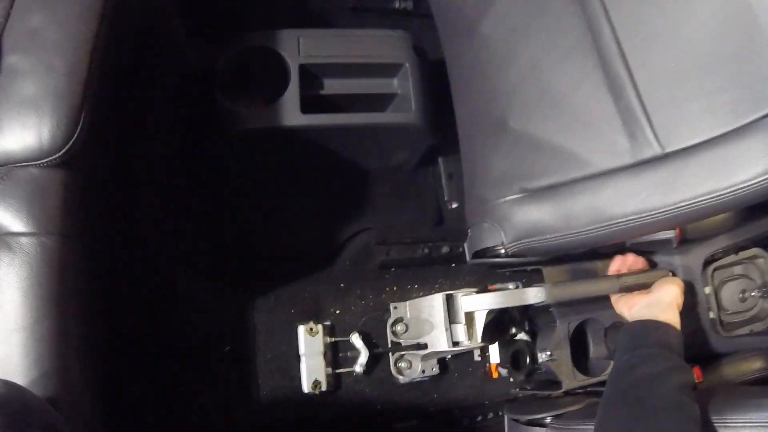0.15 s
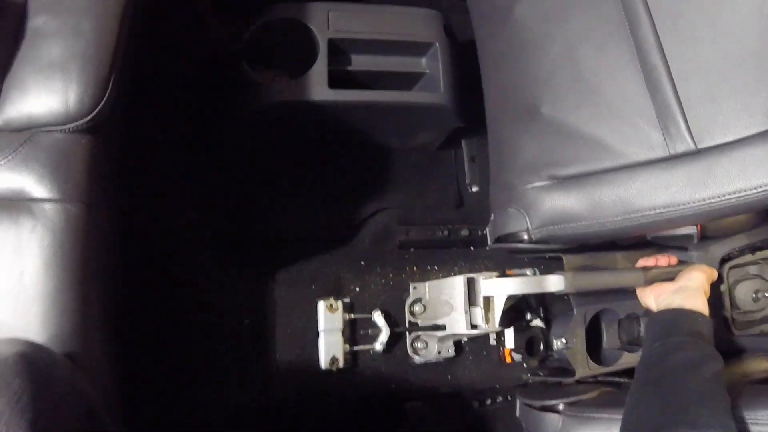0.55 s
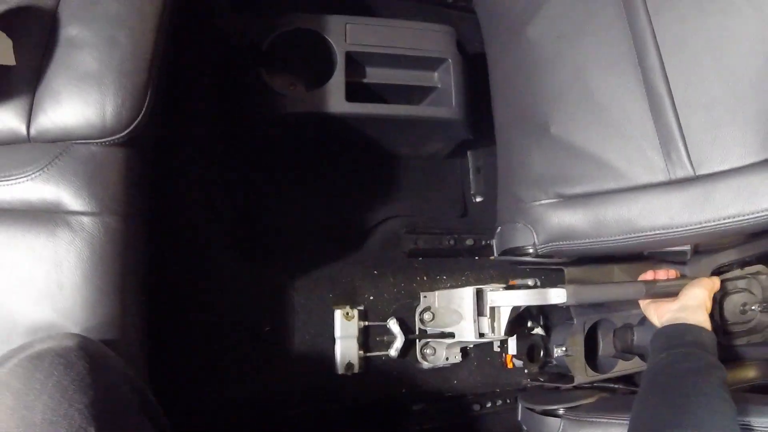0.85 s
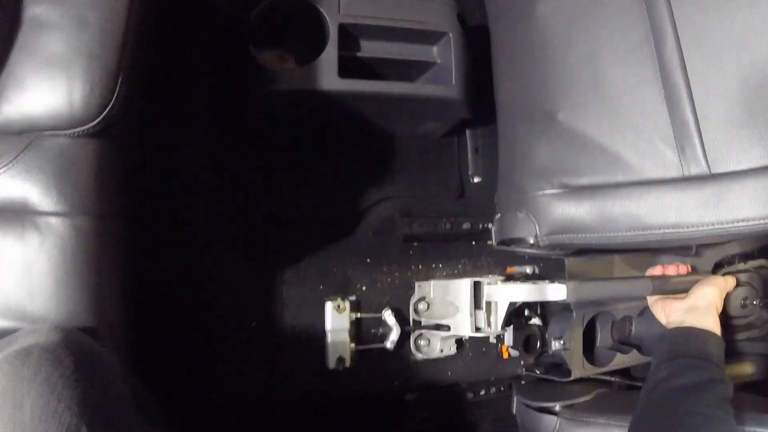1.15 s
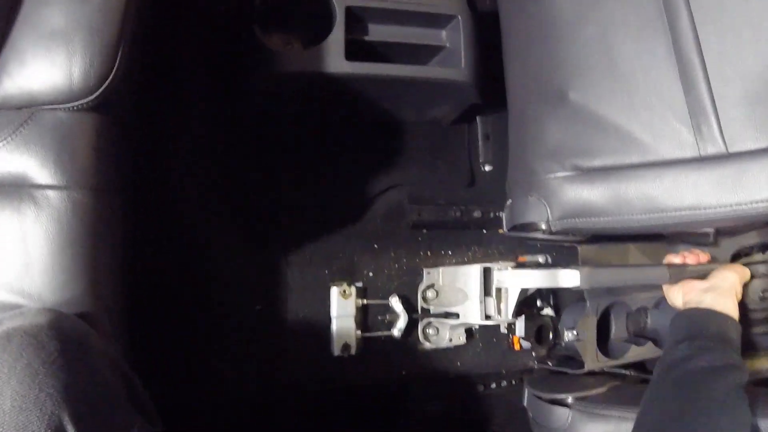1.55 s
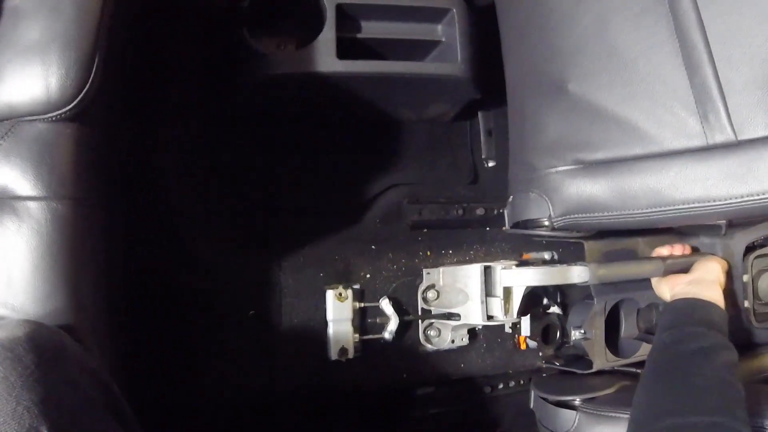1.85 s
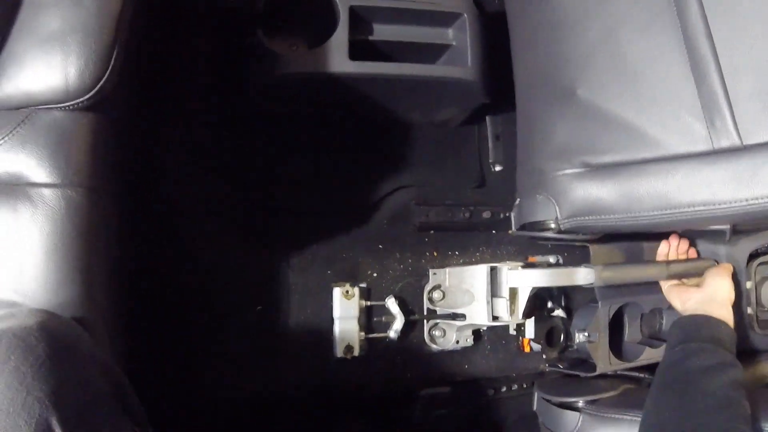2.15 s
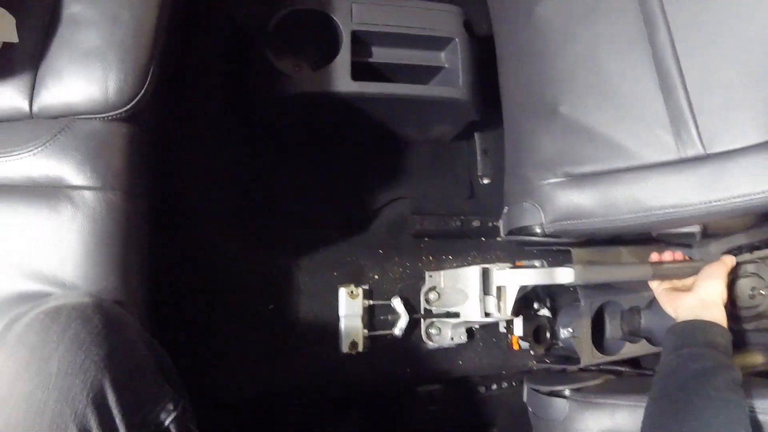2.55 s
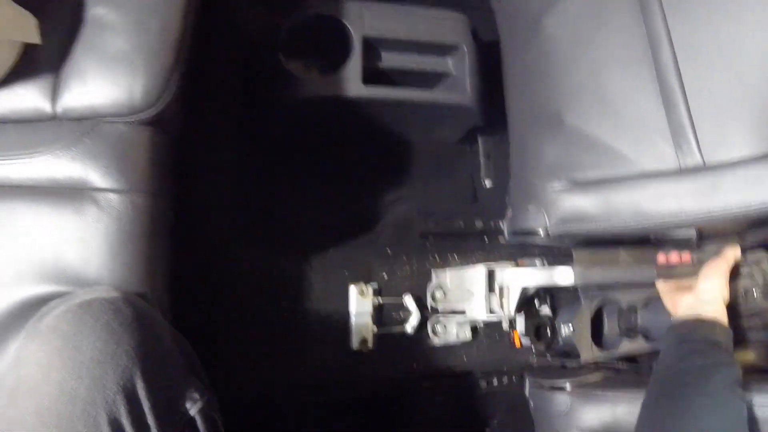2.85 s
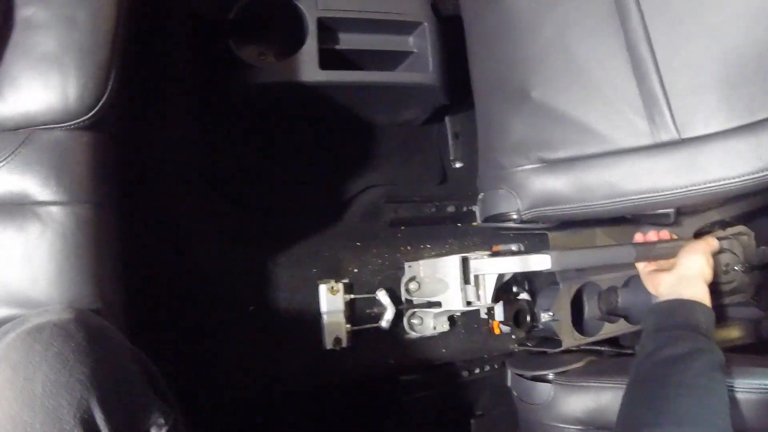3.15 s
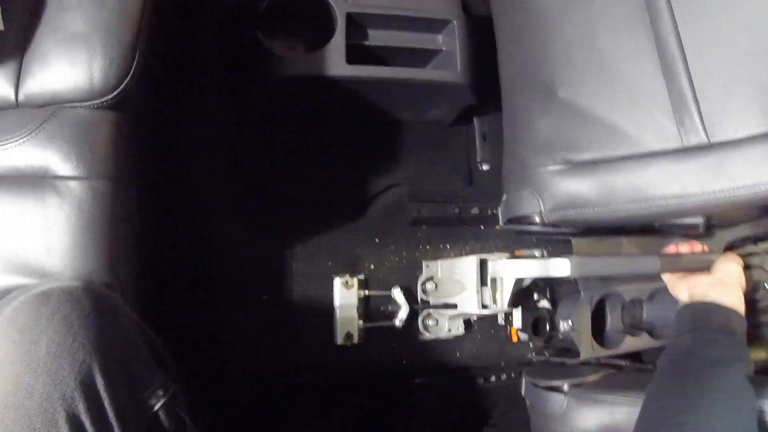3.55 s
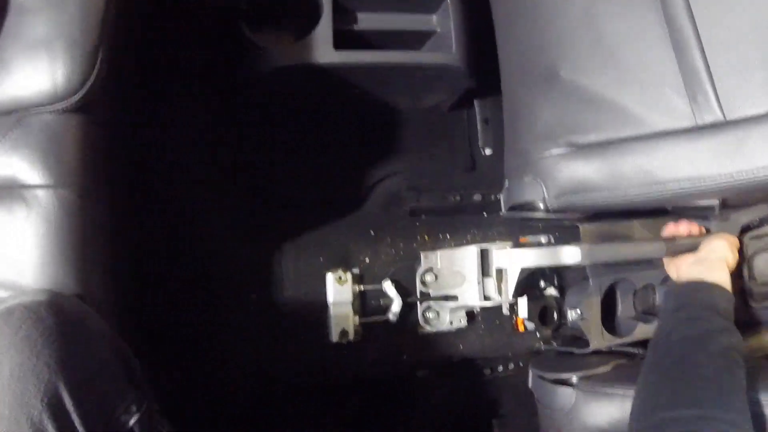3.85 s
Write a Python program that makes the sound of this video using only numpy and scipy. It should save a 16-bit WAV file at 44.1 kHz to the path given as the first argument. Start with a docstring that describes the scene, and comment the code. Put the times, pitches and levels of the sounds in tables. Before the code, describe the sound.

Handbrake lever ratchets up in sharp clicks, then drops with a hard clack, twice over.

```python
"""Handbrake in a parked car

A small camera microphone hears a handbrake lever pulled up and let down in the cabin, twice over.
The pawl snaps over the ratchet teeth and rebounds, the lever drops on its stop with a clack, the release
button and linkage tick: each contact rings the modes of lever and console and sets off a crack of noise.
The hand rubs, rustles and shakes the console: shaped noise that swells and wavers. The microphone adds
hiss and rumble, and its look-ahead limiter ducks before the loudest clacks."""
import sys
import numpy as np
from scipy import signal
from scipy.fft import rfft, irfft
from scipy.io import wavfile
from scipy.ndimage import uniform_filter1d

SR = 44100
rng = np.random.default_rng(int(sys.argv[2]) if len(sys.argv) > 2 else 0)


def voltage_ratio(decibels):
    """Convert decibels (scalar or array-like) to amplitude ratios, 20 dB per decade."""
    exponent = np.asarray(decibels, float) / 20
    return 10 ** exponent


def log_audio(samples):
    """Write samples as a 16-bit WAV file to the path given in sys.argv[1]."""
    # one column per channel
    frames = np.atleast_2d(samples).T
    # limit to full scale, then quantise
    limited = np.clip(frames, -1, 1)
    pcm = np.round(limited * 32767).astype(np.int16)
    wavfile.write(sys.argv[1], SR, pcm)


N = 176400  # samples, 4 s


def rms_one(x):
    """Scales a signal to rms 1."""
    return x / np.sqrt(np.mean(x ** 2) + 1e-20)


def at_hz(points, hz):
    """Reads a (hz, value) curve, straight between points on a log frequency axis."""
    point_hz, value = np.transpose(points)
    return np.interp(np.log(np.maximum(hz, 1)), np.log(point_hz), value)


def coloured(spectrum):
    """Steady noise of a given spectrum, rms 1."""
    hz = np.arange(N // 2 + 1) * SR / N
    white = rfft(rng.standard_normal(N))
    return rms_one(irfft(white * voltage_ratio(at_hz(spectrum, hz)), N))


def drift(rate_hz):
    """Slow chance, rms 1: noise through two equal low-pass poles."""
    r = np.exp(-2 * np.pi * rate_hz / SR)
    settled = signal.lfilter([1], [1, -2 * r, r * r], rng.standard_normal(N + SR))[SR:]
    return rms_one(settled)


def swells(rows):
    """Half-sine swells from rows (start_s, length_s, level_db)."""
    t = np.arange(N) / SR
    return sum(voltage_ratio(level_db) * np.sin(np.pi * np.clip((t - start_s) / length_s, 0, 1))
               for start_s, length_s, level_db in rows)


def ring(clicks, hz, t60_s):
    """A resonator: a unit click sets a dying sine of about height 1 ringing."""
    r, w = voltage_ratio(-60 / (t60_s * SR)), 2 * np.pi * hz / SR
    return signal.lfilter([0, np.sin(w)], [1, -2 * r * np.cos(w), r * r], clicks + 1e-18)


def train(start_s, gains):
    """Single-sample clicks at the given times."""
    return np.bincount(np.clip(start_s * SR, 0, N - 1).astype(int), gains, N)


# microphone hiss and rumble: (hz, relative level_db per Hz)
HISS_SPECTRUM = [(59, -34.5), (100, 0), (176, -10), (246, -15), (399, -16.5), (513, -13), (582, -18.5),
                 (660, -21), (1730, -23.5), (4180, -32), (6630, -23), (12700, -38.5), (15000, -53)]


def hiss():
    """Microphone noise, heavy in the bass, with a narrow band at the port resonance."""
    port_hz, port_width_hz = 6500, 260
    port = ring(rng.standard_normal(N), port_hz, np.log(1000) / (np.pi * port_width_hz))
    return voltage_ratio(-62.5) * coloured(HISS_SPECTRUM) + voltage_ratio(-76) * rms_one(port)


# grip and cable creak as the load shifts: (start_s, length_s, level_db before the lumps)
CREAKS = [(-.06, 0.16, -61), (.365, 0.082, -56), (.93, 0.04, -61.5), (.985, .035, -45.5),
          (1.16, .08, -52.5), (1.42, 0.063, -58), (1.51, 0.035, -43), (1.68, .06, -57), (1.855, 0.047, -50),
          (1.94, 0.038, -48), (2.0, 0.083, -68), (2.32, .14, -65), (2.48, 0.22, -61.5), (3.26, 0.093, -68),
          (3.35, 0.11, -62.5), (3.425, 0.059, -55), (3.54, .03, -48), (3.69, 0.057, -54.5),
          (3.85, 0.037, -45.5)]
# creak heard through the console: (hz, relative level_db per Hz)
CREAK_SPECTRUM = [(65, -33.5), (110, -12), (335, -10.5), (423, -18.5), (692, -10.5), (835, -17),
                  (937, -15.5), (3500, -36), (4550, -74.5), (7700, -120)]


def creaks():
    """Low and middle noise through the console, its swells made lumpy by a drifting level."""
    lumps_db = 3.3 * drift(55)
    return swells(CREAKS) * voltage_ratio(lumps_db) * coloured(CREAK_SPECTRUM)


# level curve of the hand shaking the console: (time_s, level_db)
SHAKING = [(0.0, -51), (0.21, -58.5), (0.39, -48), (0.62, -57), (0.67, -44), (0.96, -55.5), (1.02, -41),
           (1.14, -49), (1.2, -43), (1.27, -47.5), (1.3, -57), (1.36, -52.5), (1.51, -51), (1.54, -41),
           (1.56, -32), (1.65, -43.5), (1.88, -53), (1.96, -41.5), (2.04, -51.5), (2.46, -52), (2.52, -43),
           (2.63, -41.5), (2.71, -51), (2.96, -48), (2.99, -48.5), (3.35, -57), (3.41, -42), (3.53, -61),
           (3.55, -47), (3.58, -37), (3.68, -47.5), (3.81, -66.5), (3.85, -39.5), (4.0, -50)]
# low sound of the shaken console: (hz, relative level_db per Hz)
SHAKE_SPECTRUM = [(8.8, -26), (15, -2), (34, -0.5), (58, -1), (81, -12), (108, -10), (140, -22.5),
                  (180, -63.5), (310, -120)]


def shaking():
    """Deep noise that follows the level curve of the hand on the console."""
    level_db = np.interp(np.arange(N) / SR, *np.transpose(SHAKING))
    return voltage_ratio(level_db) * coloured(SHAKE_SPECTRUM)


# sleeve and palm slide on the grip: (start_s, length_s, level_db before the lumps)
RUSTLES = [(0.006, 0.27, -65.5), (1.064, 0.18, -70), (1.966, 0.098, -62), (2.27, 0.11, -73),
           (3.297, 0.087, -70.5), (3.919, 0.049, -58)]
# bright noise of sleeve and palm: (hz, relative level_db per Hz)
RUSTLE_SPECTRUM = [(1180, -36), (2000, -7.5), (3390, -9), (3750, -10.5), (5710, -3.5), (6720, -5),
                   (11000, -31.5), (14300, -30), (22000, -120)]


def rustles():
    """Bright noise of sleeve and palm, roughened by a faster drift in level."""
    lumps_db = 3.5 * drift(80)
    return swells(RUSTLES) * voltage_ratio(lumps_db) * coloured(RUSTLE_SPECTRUM)


LOW_BELOW_HZ = 1400  # low modes and low half of the crack lie below this
# broad crack after a blow: (hz, relative level_db per Hz)
CRACK = [(88, -44), (150, -18), (331, -7), (477, -12.5), (1110, -1.5), (1300, -10), (3820, -14), (6680, -2),
         (13600, -46), (15000, -59)]
# its decay, before each blow's share: (hz, t60_s)
CRACK_T60 = [(150, 0.25), (400, 0.069), (1000, 0.077), (2500, 0.052), (6000, 0.053), (12000, .035)]
# late wash in the cabin: (hz, relative level_db per Hz)
LATE = [(90, -25), (150, -8.5), (390, -7.5), (800, -2), (1300, -7.5), (2300, -12), (3600, -22.5),
        (6500, -12.5), (13000, -47)]
# decay of the wash: (hz, t60_s)
LATE_T60 = [(150, 0.89), (500, .35), (1200, 0.28), (2500, 0.32), (6000, 0.28), (12000, 0.04)]


def crack_response(crack_db, late_db, share):
    """Third-octave noise dying by band, a quick part and a weak late part; low and high halves apart."""
    build_up_s = 0.009
    t = np.arange(SR // 2) / SR
    halves = np.zeros((2, len(t)))
    edges_hz = 140 * 2 ** np.arange(0, 6.9, 1 / 3)
    for low, high in zip(edges_hz, edges_hz[1:]):
        hz = np.sqrt(low * high)
        quick = voltage_ratio(at_hz(CRACK, hz) - 60 * t / (at_hz(CRACK_T60, hz) * share))
        late = voltage_ratio(late_db + at_hz(LATE, hz) - 60 * t / at_hz(LATE_T60, hz))
        late *= 1 - np.exp(-t / build_up_s)
        band = signal.butter(2, [low, high], "band", fs=SR, output="sos")
        noise = rng.standard_normal(len(t)) * (quick + late)
        halves[int(hz > LOW_BELOW_HZ)] += signal.sosfilt(band, noise)
    first_10_ms = halves.sum(0)[:SR // 100]
    return voltage_ratio(crack_db) * halves / np.sqrt(np.mean(first_10_ms ** 2))


# modes of lever, ratchet plate and console: (hz, pawl_db, stop_db, t60_s before each blow's share)
MODES = [(65.2, -24, -16, .2), (130, -20.5, -25, 0.065), (233, -20.5, -13.5, 0.024),
         (330, -16.5, -15.5, 0.071), (357.3, -18, -17.5, .055), (517.5, -19.5, -16, 0.13),
         (611, -13, -1, 0.018), (677.3, -6.5, -1, 0.063), (756, -10.5, -9, 0.05), (904, -6.5, -18, 0.041),
         (1021, -13.5, -27.5, .06), (1123.7, -12, -13.5, 0.11), (1626, -16, -16.5, 0.034),
         (2350, -10.5, -0.5, 0.021), (2880, -8.5, -2.5, .012), (3256, -11, -13, 0.044),
         (3687, -25.5, -16.5, .04), (4690, -6, 0, 0.012), (5000, 1.5, 0.5, 0.0052), (5520, -12, -13, 0.024),
         (5430, -10.5, -22, .04), (5780, -16, -17.5, .04), (5930, -4, -9, 0.018), (6390, 5, -2, 0.0044),
         (6560, -8, -16, 0.036), (6770, -9, -23, 0.022), (7740, -15.5, -45, .04), (8320, -25, -31, 0.06)]


def lever(contacts, column, spread_db, under):
    """Contacts (start_s, level_db, low_db) ring every mode and set off the crack."""
    low_lag_s = 0.0011  # the console answers later
    crack_db, late_db, share = under
    start_s, level_db, low_db = np.transpose(contacts)
    chance_db = rng.normal(0, spread_db, (len(start_s), len(MODES)))
    out = np.zeros(N)
    for k, mode in enumerate(MODES):
        hz, t60_s = mode[0], mode[3] * share
        is_low = hz < LOW_BELOW_HZ
        mode_db = level_db + mode[column] + low_db * is_low + chance_db[:, k]
        sign = (-1) ** k  # successive modes start in opposite directions
        out += ring(train(start_s + low_lag_s * is_low, voltage_ratio(mode_db) * sign), hz, t60_s)
    low_half, high_half = crack_response(crack_db, late_db, share)
    out += signal.fftconvolve(train(start_s, voltage_ratio(level_db + low_db)), low_half)[:N]
    out += signal.fftconvolve(train(start_s, voltage_ratio(level_db)), high_half)[:N]
    return out


CONTACT_DB = -6.5  # ringing and crack against the level_db of a tick or snap
LOOSE_SPREAD_DB = 3  # chance in each mode under ticks and clacks
# linkage ticks: (start_s, level_db before CONTACT_DB, low_db added below LOW_BELOW_HZ)
TICKS = [(0.3925, -32.5, -15), (0.4004, -43, -3), (0.4134, -43.5, 0.5), (0.623, -44, -17), (1.3244, -52, 2),
         (1.3404, -53, -9), (1.4212, -54, 12.5), (1.4406, -55, 6), (1.4531, -44.5, -6), (1.4704, -51, -6),
         (1.8567, -46, -10), (1.9445, -26.5, -3.5), (1.9784, -50, -15), (2.0038, -49, -9),
         (2.0134, -47, -12), (2.0298, -38, -20), (2.2283, -49, 1), (2.3436, -50, -11), (2.3735, -48, -19),
         (2.4234, -51, -10), (3.2844, -42, -19), (3.3463, -45.5, -19), (3.4376, -55, -11),
         (3.8104, -53.5, -14.5), (3.9295, -40, -16), (3.9454, -57, 13.5)]
# crack and wash under a tick: (crack_db, late_db, share of the ring time)
UNDER_TICK = (-11.5, -14.5, .4)


def ticks():
    """Light single contacts of button and linkage, ringing the modes as the pawl does."""
    touches = [(start_s, level_db + CONTACT_DB, low_db) for start_s, level_db, low_db in TICKS]
    return lever(touches, column=1, spread_db=LOOSE_SPREAD_DB, under=UNDER_TICK)


# pawl snaps over a tooth:
# (start_s, level_db before CONTACT_DB, low_db added below LOW_BELOW_HZ, rebound_db against the snap)
TEETH = [(0.647, -19, -3, -13.5), (0.6914, -10.5, -1.5, -8.5), (0.7609, -11, -0.5, -11),
         (1.0135, -11.5, -0.5, -7.5), (1.0369, -12, -0.5, -4), (2.607, -11, 0.5, -8), (2.67, -8, -1.5, -9),
         (2.8547, -9.5, 0, -5.5), (2.9023, -7.5, -3, -13.5), (2.9504, -9, -2, -6.5)]
# crack and wash under a snap: (crack_db, late_db, share of the ring time)
UNDER_PAWL = (-10, -15.5, 0.83)


def pawl():
    """Each snap rebounds twice on the next tooth flank, with less low sound each time."""
    rebound_s, second_loss_db, low_loss_db = 0.0038, 7, 12
    touches = []
    for start_s, level_db, low_db, rebound_db in TEETH:
        snap_db = level_db + CONTACT_DB
        for k, change_db in enumerate((0, rebound_db, rebound_db - second_loss_db)):
            touches.append((start_s + k * rebound_s, snap_db + change_db, low_db - k * low_loss_db))
    return lever(touches, column=1, spread_db=2.2, under=UNDER_PAWL)


# lever hits its stop, or the button bottoms out:
# (start_s, level_db, low_db added below LOW_BELOW_HZ, build_up_s)
CLACKS = [(1.539, -15.5, 7, 0.0027), (1.904, -28.5, -2, 0.0014), (3.5646, -13.5, 5.5, .004),
          (3.8427, -36, 7, 0.0012)]
# crack and wash under a clack: (crack_db, late_db, share of the ring time)
UNDER_STOP = (-8.5, -18, 0.76)


def stop():
    """The play in the linkage closes in a quick run of five contacts around each clack."""
    steps = [(-0.68, -34), (-0.6, 2), (0.037, -5), (0.33, -3), (1.2, -9.5)]  # (share of build_up_s, dB)
    touches = [(start_s + share * build_up_s, level_db + step_db, low_db)
               for start_s, level_db, low_db, build_up_s in CLACKS
               for share, step_db in steps]
    return lever(touches, column=2, spread_db=LOOSE_SPREAD_DB, under=UNDER_STOP)


def scene():
    """Lever, hand and microphone hiss; the top of the lever's blows is cut."""
    top_cut = signal.butter(4, 11600, fs=SR, output="sos")
    blows = signal.sosfilt(top_cut, pawl() + stop() + ticks())
    hand = creaks() + rustles() + shaking()
    return (blows + hand + hiss())[None]


def limiter_gain(sound):
    """The limiter sees loud low sound coming, ducks at once and recovers slowly."""
    ceiling_db, look_ahead_s, sense_s = -22.5, 0.056, 0.012
    sense_below_hz, recovery_db_per_s = 800, 3
    sensed = signal.sosfilt(signal.butter(2, sense_below_hz, fs=SR, output="sos"), sound)
    level_db = 10 * np.log10(uniform_filter1d(sensed ** 2, int(sense_s * SR)) + 1e-12)
    ahead = int(look_ahead_s * SR)
    coming_db = np.r_[level_db[ahead:], np.full(ahead, -99.0)]
    over_db = np.maximum(coming_db - ceiling_db, 0)
    # a running maximum on a rising slope makes the ducking fall back at a steady rate
    slope_db = recovery_db_per_s * np.arange(N) / SR
    duck_db = np.maximum.accumulate(over_db + slope_db) - slope_db
    return voltage_ratio(-duck_db)


def roll_off(x):
    """The treble ends steeply here."""
    return signal.sosfilt(signal.butter(12, 15180, fs=SR, output="sos"), x)


def record(dry):
    """The microphone's limiter rides the level of the whole mix."""
    finished = dry * limiter_gain(dry[0])
    return roll_off(finished)


dry = scene()
out = record(dry)
log_audio(out)
```